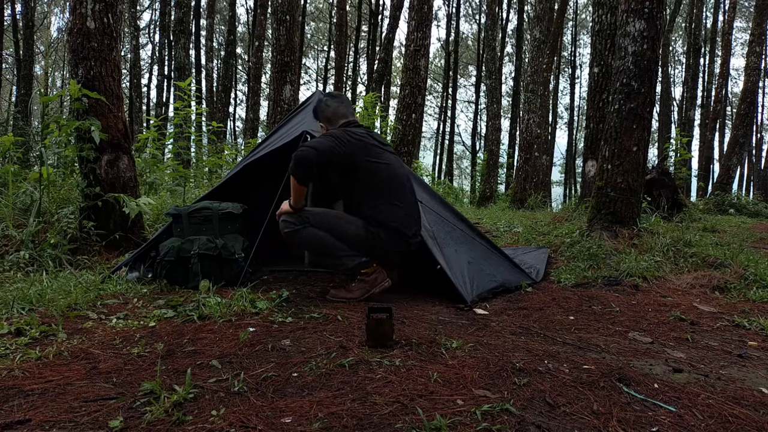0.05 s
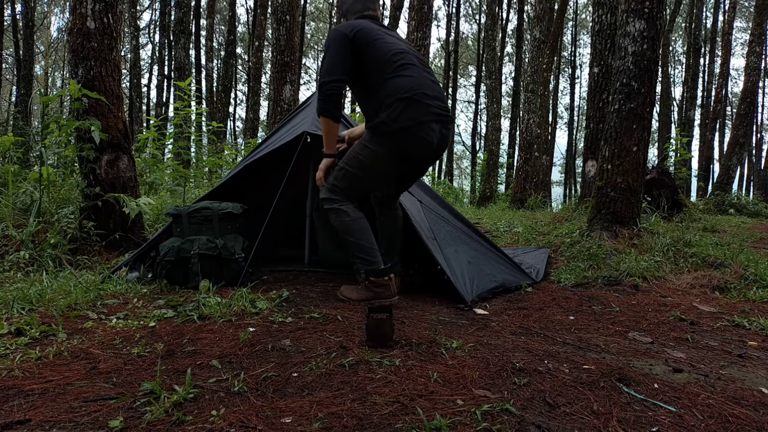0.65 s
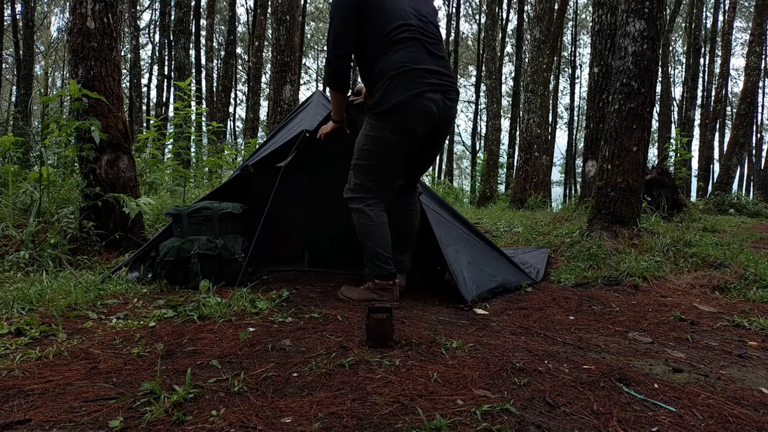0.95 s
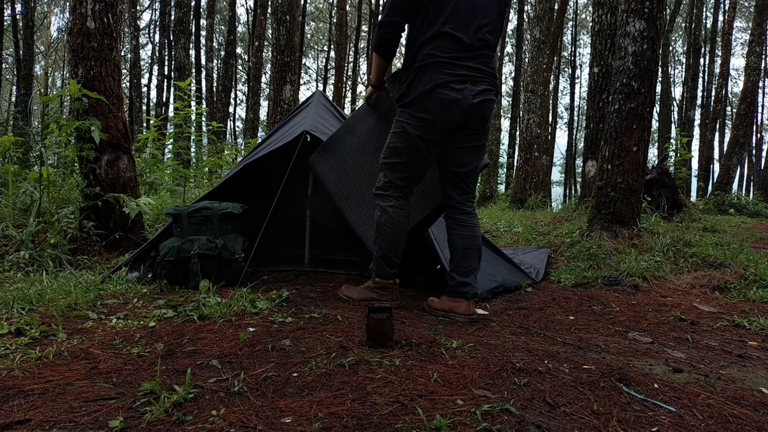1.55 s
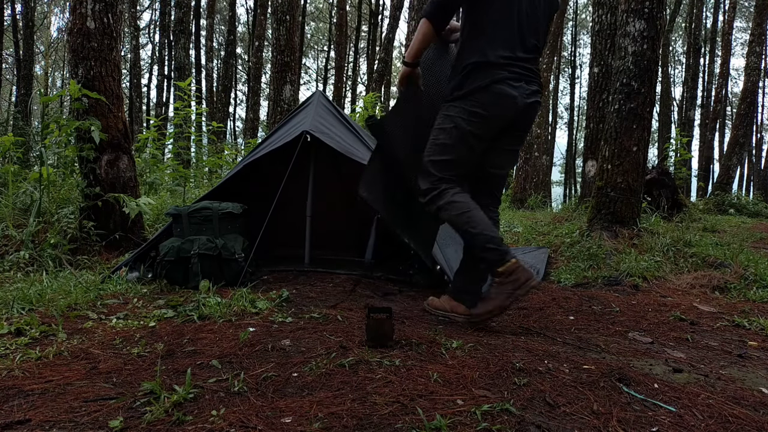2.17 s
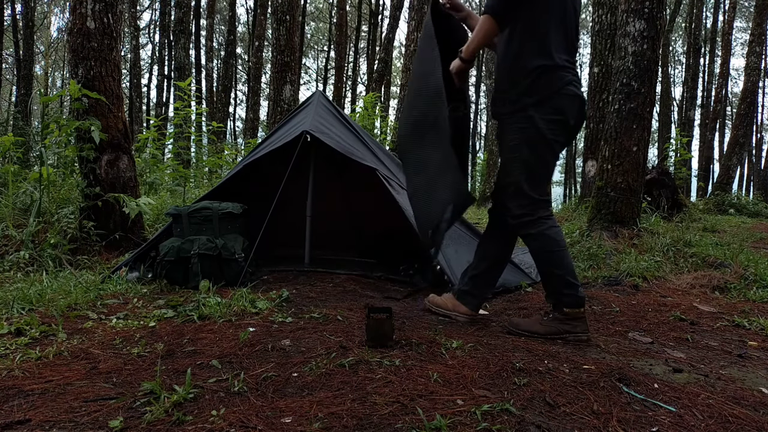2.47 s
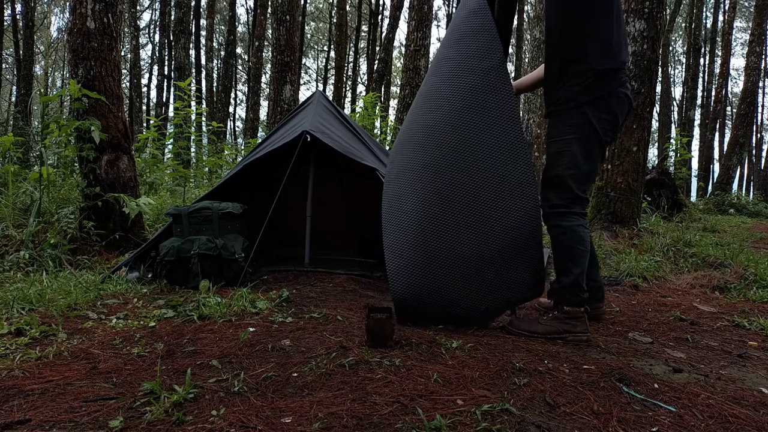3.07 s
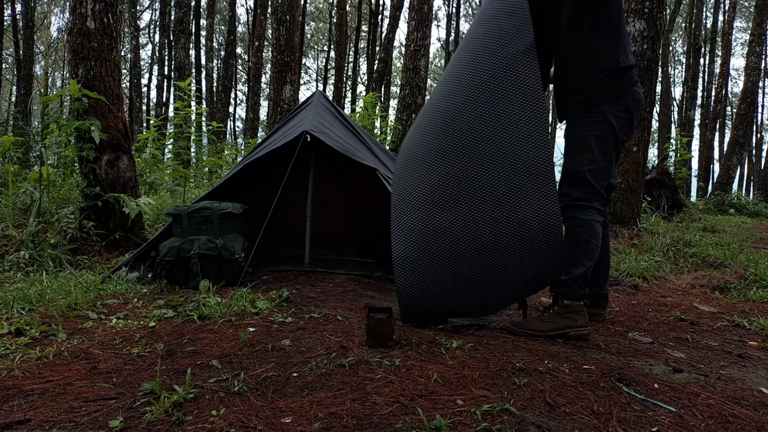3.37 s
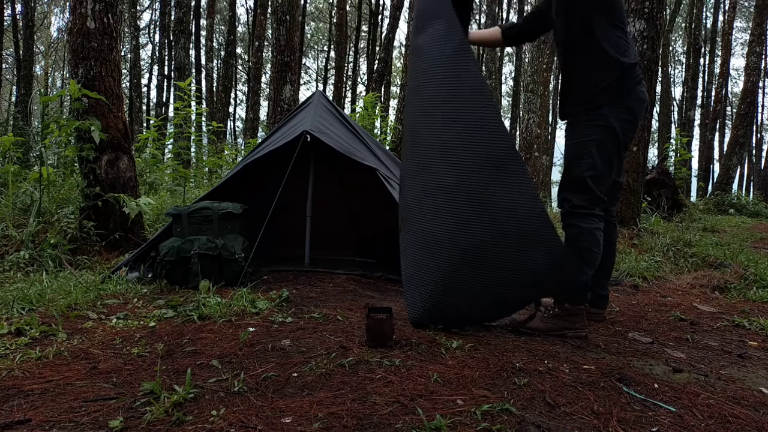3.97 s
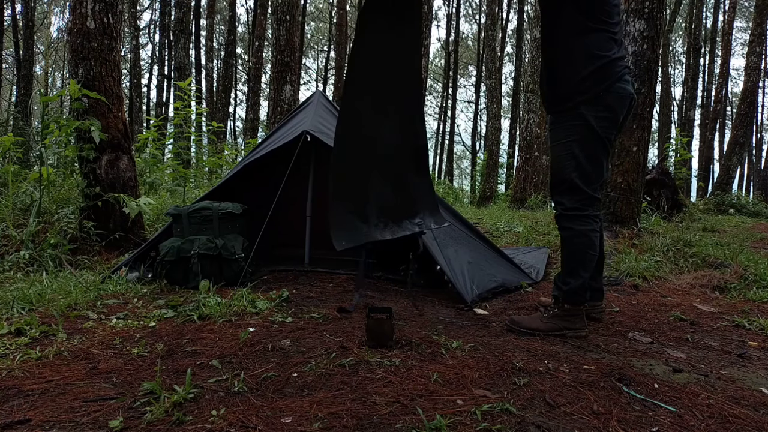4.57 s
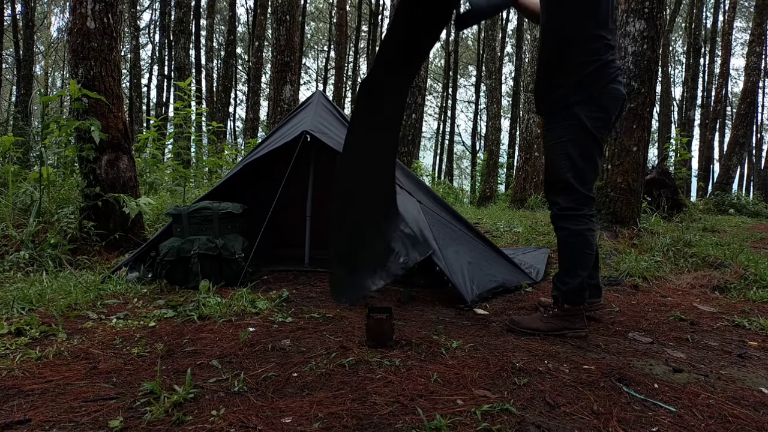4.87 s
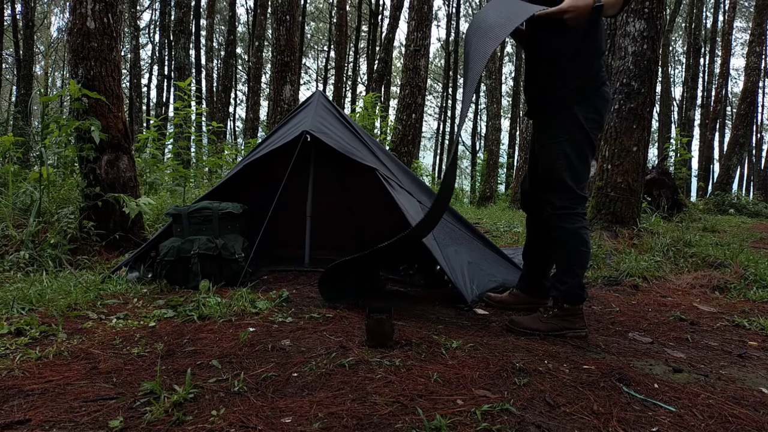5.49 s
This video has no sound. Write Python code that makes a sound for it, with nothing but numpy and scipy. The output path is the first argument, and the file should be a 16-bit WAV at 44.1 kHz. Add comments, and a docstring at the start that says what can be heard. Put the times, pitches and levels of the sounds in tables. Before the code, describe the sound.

In a quiet forest, someone close to the microphone pulls a foam mat from a tent: rustling clothes, a hiss of nylon and several blunt bumps. Trousers brush and a twig ticks. The mat then unrolls in the loudest burst, its ribs catching and squeaking while the loose sheet wobbles and knocks. It settles into light rubbing and one shorter swish against the tent, with a faint low rumble of air underneath.

```python
"""A foam sleeping mat swishes out of a nylon tent and is unrolled in a quiet pine forest.
Its ribbed faces scrape, catch and squeak as the roll falls open; the loose sheet wobbles and knocks.
A second, shorter swish slides it back along the fabric. Clothes rustle, needles and twigs tick.
Underneath lies a bed of still air with one far insect, and the trunks send back a faint tail."""
import sys
import numpy as np
from scipy import signal
from scipy.fft import rfft, irfft, next_fast_len
from scipy.io import wavfile
from scipy.ndimage import uniform_filter1d

SR = 44100
rng = np.random.default_rng(int(sys.argv[2]) if len(sys.argv) > 2 else 0)


def store_wav(level_fs):
    """Save 16-bit WAV to argv[1]."""
    pcm = np.round(np.clip(np.atleast_2d(level_fs), -1, 1) * 32767)
    wavfile.write(sys.argv[1], SR, pcm.T.astype(np.int16))


N = 252693
TIME = np.arange(N) / SR

# Tone curves for the noise layers. Each row: frequency in Hz, relative level in dB.
AIR_EQ = [(15, 1.5), (40, 7.5), (75, 5), (140, 5.5), (220, -2), (330, -9.5), (700, -13), (1300, -16.5),
          (2500, -20.5), (4500, -23.5), (8000, -26.5), (14000, -29.5)]  # still forest
RUMBLE_EQ = [(15, -41), (45, 4), (80, -1.5), (120, -3), (220, -39)]  # air pushed by the handling
SHIRT_EQ = [(120, -22), (200, -3), (459, -7.5), (761, -11), (1040, -19), (1150, -15), (2210, -11.5),
            (3290, -19.5), (3940, -21), (4890, -13), (7550, -2.5), (13700, -18.5), (15000, -25)]  # bright shirt rustle
LEGS_EQ = [(150, -10), (280, -11), (420, -0.5), (750, -19), (1300, -13), (2300, -13), (3100, -15),
           (4400, -14.5), (5500, -17), (8200, -14.5), (10000, -25), (15000, -37)]  # legs rubbing
SHEET_BRUSH_EQ = [(40, -20), (120, 5.5), (250, 3), (600, -8.5), (1100, -9), (1600, -8), (2700, -11.5),
                  (3500, -12), (4800, -16.5), (8000, -16), (10500, -33), (15000, -40)]  # dark brushing of the foam sheet
FLUTTER_EQ = [(40, -20), (110, -30), (180, -2.5), (380, -2), (600, -8.5), (950, -27), (1500, -15),
              (3000, -34), (8000, -49)]  # a bend spreading through the sheet
SHEET_MODES_EQ = [(115, -34), (165, 12), (250, 13), (320, 11), (480, 0), (900, -59)]  # modes around the main wobble
SCRAPE_BODY_EQ = [(30, -34), (110, -21), (200, 8.5), (500, 7.5), (900, 2.5), (1400, -0.5), (2400, -4),
                  (3700, -9.5), (4600, -28), (8000, -35), (14000, -61)]  # coarse slips of the ribs
SCRAPE_HISS_EQ = [(2500, -24), (4300, -2), (6000, 2.5), (8300, 0.5), (10500, -10.5), (14000, -23.5)]  # the foam's fine skin
RASP_EQ = [(100, -7), (250, -7), (480, 6), (750, -2.5), (920, 0), (1200, -11.5), (1620, 1), (2200, 0.5),
           (2750, -4), (3300, -6), (3800, -4), (4800, -15)]  # mat pressing on nylon
SLIDE_OUT_EQ = [(1470, -41), (2500, -11.5), (3040, -5), (3320, -14), (3640, -6.5), (5830, 1), (10500, -2.5),
                (14200, -17.5), (14700, -30), (15000, -55.5)]  # nylon hiss, outward stroke
SLIDE_BACK_EQ = [(1470, -51), (2500, -22), (2630, -28), (3690, -6), (4730, -5.5), (8880, -5.5),
                 (10500, -8.5), (12000, -23), (13900, -26), (14700, -34.5), (15000, -63.5)]  # nylon hiss, return stroke

# The tail among the trunks. Each row: frequency in Hz, t60 in seconds.
FOREST_DECAY = [(150, 0.37), (1000, 0.45), (4000, 0.51), (12000, 0.18)]
# Twigs giving softly. Each row: start in seconds, level in dB, lowest mode in Hz, rise and t60 in
# seconds, tilt in dB per octave.
TWIG_CRACKS = [(1.802, -45, 1117, 0.0018, 0.021, -12), (4.8515, -51.5, 778, 0.0057, 0.048, 0.5)]
# A twig's woody ring. Each row: frequency as a multiple of the lowest mode, relative level in dB.
WOOD_MODES = [(1, -1), (2.03, -2), (2.87, -11), (3.51, -19), (4.06, -17), (4.95, -13), (5.92, -23)]
# Movements of body or sheet. Each row: peak time in seconds, base level in dB, rise and fall in
# seconds, what rubs ("shirt", "legs" or "sheet").
MOVEMENTS = [(.08, -68, 0.11, 0.19, "shirt"), (.35, -62.5, 0.27, 0.18, "shirt"),
             (.55, -62.5, 0.16, 1, "shirt"), (.72, -61.5, 0.1, 0.14, "shirt"),
             (1.25, -70, 0.049, 0.18, "legs"), (1.335, -59, 0.11, 0.18, "legs"),
             (1.47, -69, 0.13, 0.37, "legs"), (1.73, -68.5, 0.58, 0.31, "legs"),
             (1.88, -68.5, 0.03, 0.21, "legs"), (2.01, -64, 0.18, 0.19, "legs"),
             (2.29, -66.5, 0.28, 0.23, "legs"), (2.70, -67.5, 0.12, 0.29, "legs"),
             (3.41, -66, 0.037, 0.19, "sheet"), (3.962, -58.5, 0.18, 0.059, "sheet"),
             (4.219, -67, 0.19, 0.22, "sheet"), (5.33, -74.5, 0.59, 0.22, "sheet")]
# Taut weave zipping past. Each row: peak time in seconds, level in dB, rise and fall in seconds,
# centre and width in Hz.
WEAVE_ZIPS = [(0.514, -66, 0.046, 0.11, 4020, 990), (.89, -59.5, 0.079, 0.079, 2240, 220),
              (.96, -60, 0.034, .035, 1586, 120), (1.13, -60.5, 0.044, 0.063, 1880, 1200),
              (1.755, -76, 0.027, .04, 2680, 400), (1.872, -69, 0.013, 0.025, 8350, 500),
              (2.021, -74, 0.091, 0.068, 7900, 1400), (2.29, -74.5, 0.14, 0.23, 7530, 1000),
              (2.914, -57, .012, 0.016, 2950, 250), (3.165, -64, 0.043, 0.027, 3600, 300),
              (5.065, -62.5, 0.037, 0.067, 2080, 400), (5.265, -80, .05, .05, 3950, 150),
              (5.4, -83, 0.043, 0.056, 2050, 150)]
# Single ribs and dry needles flicking. Each row: start in seconds, level in dB, centre in Hz,
# t60 in seconds.
FLICKS = [(1.085, -42, 870, 0.035), (2.5445, -68, 6140, .015), (2.864, -37.5, 3090, 0.01),
          (2.965, -47, 1680, 0.021), (2.985, -39.5, 2850, 0.014), (3.0737, -37, 2830, 0.017),
          (3.107, -42.5, 2900, 0.017), (3.109, -38.5, 6060, 0.019), (3.139, -44.5, 3600, 0.036),
          (3.3772, -44.5, 4640, 0.0085), (3.3772, -51.5, 6700, .008), (3.383, -50, 6500, .008),
          (3.402, -45, 2240, 0.01), (3.697, -58, 4970, 0.016), (3.914, -50, 3500, .012),
          (3.9755, -52, 2700, 0.015), (3.9755, -52, 6500, .01), (5.171, -48, 890, 0.022)]
# The sheet buckles or is bumped. Each row: start in seconds, level in dB, pitch in Hz, t60 in seconds,
# snap level in dB relative to the swing, time to the snap's peak in seconds.
SHEET_KNOCKS = [(0.475, -53.5, 635, 0.019, -11, .0003), (1.0841, -30.5, 482, .035, -17, 0.0011),
                (1.3194, -25.5, 318, 0.017, -2, 0.00054), (1.3227, -34.5, 403, 0.018, 5, 0.00058),
                (1.3264, -35, 930, 0.024, -6, 0.00045), (1.3487, -36.5, 507, 0.02, 6, 0.00088),
                (1.3548, -38, 394, .05, -8, 0.00056), (1.366, -41, 538, 0.037, -10, .0007),
                (1.384, -47, 380, .06, 1, 0.0009), (1.858, -53.5, 443, 0.14, -11, 0.00042),
                (1.9956, -45.5, 387, 0.035, -4, 0.00079), (2.0328, -37.5, 297, 0.014, -3, 0.00091),
                (2.037, -47, 459.5, 0.15, -22, 0.00055), (2.831, -50, 194, 0.23, -8, 0.00044),
                (2.8633, -39.5, 467, 0.022, 4, 0.00027), (2.987, -49, 378, .12, -12, .0006),
                (3.1425, -30.5, 205, 0.067, 0, 0.00095), (3.229, -29.5, 1100, .005, -2, 0.00024),
                (3.235, -29, 940, .011, -1.5, 0.00028), (3.2454, -29.5, 955, 0.0051, -1, 0.00032),
                (3.2482, -30, 274, 0.048, -3.5, 0.00089), (3.2657, -32.5, 336, .025, 3, 0.00037),
                (3.282, -38, 380, 0.017, 6, 0.00039), (3.3769, -23.5, 350, 0.0086, -0.5, 0.00089),
                (3.3824, -34, 213, 0.032, 4.5, 0.00074), (3.3882, -33, 240, 0.03, -2, 0.00074),
                (3.4022, -32, 620, 0.013, 7, 0.00047), (3.4062, -37, 246, 0.052, 1, .0007),
                (4.282, -45.5, 280, 0.075, 0, 0.00062), (5.166, -50, 292, 0.088, 2, .0004)]
# Foam voicing, from low groans to squeaks. Each row: start and length in seconds, pitch in Hz,
# level in dB, loss per overtone in dB, shake as a share of the pitch.
FOAM_SQUEAKS = [(0.907, 0.031, 282, -40.5, 12.5, 0.13), (0.947, 0.042, 308, -40, 13, 0.18),
                (1.095, .042, 460, -42.5, 25, 0.18), (1.645, 0.031, 402, -60, 24, 0.14),
                (1.671, 0.06, 394, -62, 21, 0.054), (3.017, 0.022, 345, -25, 27, 0.055),
                (3.008, 0.053, 800, -38, 25, 0.12), (3.007, 0.066, 1146, -44.5, 18, .062),
                (3.135, .015, 1138, -43.5, 23, 0.064), (4.042, 0.063, 832, -62.5, 8.5, 0.22),
                (4.296, 0.069, 984, -65.5, 18, 0.087), (4.319, 0.034, 712, -56, 17, 0.091)]
# Foam scraping on foam. Each row: start in seconds, level of the coarse slips in dB, rise and t60 in
# seconds, tilt of the slips in dB per octave, level of the fine hiss in dB.
RIB_SCRAPES = [(.9, -50, 0.0062, 1, -10.5, -66), (1.225, -60.5, 0.024, 0.41, 2, -73),
               (1.298, -50, .014, .06, -7, -75), (1.323, -46, 0.0063, 0.16, -7, -62),
               (1.925, -52.5, 0.12, .3, -9, -82), (2.831, -66, 0.0059, 1, 8, -67.5),
               (2.856, -46.5, 0.016, 0.089, 2, -56.5), (2.898, -56.5, .015, 0.51, 17, -56),
               (2.94, -58.5, .024, 0.34, 0, -58), (2.985, -47.5, 0.0024, 0.14, -0.5, -62),
               (3.0125, -40.5, 0.0018, 0.44, 3, -44.5), (3.073, -46, 0.0036, 0.18, 10, -60),
               (3.103, -41.5, 0.0035, 0.043, 8, -54), (3.138, -42, .003, 0.062, -11, -74),
               (3.229, -43, 0.0006, .03, 7, -58), (3.2312, -36.5, 0.0015, 0.096, 2, -49),
               (3.247, -47, 0.0035, 0.24, -0.5, -53.5), (3.261, -41, 0.0035, .13, -1, -67),
               (3.295, -40.5, 0.021, 0.19, 0, -57), (3.377, -48, 0.0076, .16, -1, -66),
               (4.16, -63, 0.036, .16, 5.5, -84), (5.09, -53.5, 0.035, 0.26, -2, -67),
               (5.41, -72.5, 0.034, .07, 9, -80)]
# The mat slides on the tent, out and back. Each row: times of reaching speed and of starting to slow
# in seconds, base level in dB, attack and release in seconds, times of slipping free and of full
# pressure in seconds, rasp level in dB, air pocket pitch on reaching speed in Hz, its glide in octaves
# per second, its level in dB. Rasp and pocket levels are relative to the hiss.
STROKES = [(.785, 1.025, -52.5, 0.11, 0.16, 1.025, 0.68, -5, 2350, -0.89, -15.5),
           (5.04, 5.12, -53, 0.067, 0.027, 5.108, 5.085, -8.5, 3800, -1.2, -6.5)]


def amp(db):
    """Decibels to gain."""
    return 10 ** (np.asarray(db) / 20)


def unit(x):
    """Scales to rms 1."""
    return x / np.sqrt(np.mean(x ** 2) + 1e-20)


def read(points, hz):
    """Reads a curve on a log-frequency axis."""
    point_hz, value = np.transpose(points)
    return np.interp(np.log(hz + 1), np.log(point_hz + 1), value)


def colour(x, eq, tilt_db=0):
    """Shapes x with a tone curve, plus a tilt per octave above about 500 Hz, at rms 1."""
    hz = np.fft.rfftfreq(len(x), 1 / SR)
    gain = amp(read(eq, hz) + tilt_db * np.log2(1 + hz / 500))
    return unit(irfft(rfft(x) * gain, len(x)))


def add(mix, start, sound):
    """Lays a sound into the mix at a start time in seconds."""
    part = mix[max(round(start * SR), 0):][:len(sound)]
    part += sound[:len(part)]


def drift(n, hz):
    """Smooth random modulation up to a rate of hz, at about rms 1."""
    noise = rng.standard_normal(next_fast_len(n + SR // 2))
    return colour(noise, [(hz, 0), (2 * hz, -80)])[:n]


def swell(peak, rise, fall, shape=2):
    """Envelope, 20 dB down one rise before the peak and one fall after; shape 1 is pointed, 2 round."""
    away = np.maximum((peak - TIME) / rise, (TIME - peak) / fall)
    return amp(-20 * np.minimum(away, 10) ** shape)


def resonate(x, hz, width_hz):
    """A steep resonance at a steady or gliding pitch, at rms 1."""
    carrier = np.exp(2j * np.pi * np.cumsum(hz * np.ones(len(x))) / SR)
    pole = np.exp(-np.pi * width_hz / SR)
    return unit((carrier * signal.lfilter([1], [1, -2 * pole, pole * pole], x / carrier)).real)


def friction(n, slips_per_s, share):
    """Separate slips of uneven size, with a share of the power, over the hiss of countless tiny ones."""
    slips = rng.standard_normal(n) * (rng.random(n) < slips_per_s / SR)
    return np.sqrt(share) * unit(slips) + np.sqrt(1 - share) * rng.standard_normal(n)


def folds(x, depth_db):
    """Moving folds and pockets give rubbing noise narrow resonances that come and go."""
    hz, _, spectrum = signal.stft(x, SR, nperseg=1024)
    patches = rng.standard_normal(spectrum.shape)
    for _ in range(2):
        patches = uniform_filter1d(uniform_filter1d(patches, size=4, axis=0), size=8, axis=1)
    patches = np.minimum(unit(patches), 1.9)
    distinct = 1 / (1 + (hz[:, None] / 9000) ** 4)  # in the top end they crowd together and even out
    spectrum = spectrum * amp(depth_db * distinct * patches)
    return unit(signal.istft(spectrum, nperseg=1024)[1][:len(x)])


def forest_air(air_db=-68, insect_db=-88, insect_hz=3340):
    """The bed: low rumble and thin hiss of still air, and a far insect trill that swells and fades."""
    trill = np.sqrt(2) * drift(N, hz=170) * np.sin(2 * np.pi * insect_hz * TIME)
    insect = amp(insect_db) * swell(peak=5.33, rise=3.6, fall=0.43) * trill
    return amp(air_db) * colour(rng.standard_normal(N), AIR_EQ) + insect


def trunk_echoes(x, wet_db=-23, echoes_per_s=1500, predelay_s=0.012):
    """Sparse reflections from the trunks, each band dying at its own speed."""
    taps = rng.standard_normal(SR) * (rng.random(SR) < echoes_per_s / SR)
    taps *= np.arange(SR) > predelay_s * SR
    hz, t, spectrum = signal.stft(taps, SR, nperseg=256)
    decay = amp(-60 * t / read(FOREST_DECAY, hz)[:, None])
    tail = signal.istft(spectrum * decay, SR, nperseg=256)[1]
    return amp(wet_db) * signal.fftconvolve(x, tail / np.linalg.norm(tail))[:N]


def pushed_air(handling, gain_db=-35, follow=0.69):
    """Soft low-end pressure of pushed air, growing with the vigour of the handling."""
    vigour = np.sqrt(abs(uniform_filter1d(handling ** 2, size=4400)))
    return colour(rng.standard_normal(N), RUMBLE_EQ) * amp(gain_db) * vigour ** follow


def twigs():
    """Wood cracks softly under a load: its modes swell roughly for a few milliseconds and die."""
    out, t = np.zeros(N), np.arange(SR // 8) / SR
    for start, db, hz, rise, t60, tilt_db in TWIG_CRACKS:
        cycles = np.cumsum(hz * (1 + 0.035 * drift(len(t), hz=500))) / SR
        ring = sum(amp(mode_db + tilt_db * np.log2(k)) * np.sin(2 * np.pi * (k * cycles + rng.random()))
                   for k, mode_db in WOOD_MODES)
        splinter = amp(3 * drift(len(t), hz=700))
        envelope = np.minimum(t / rise, 1) ** 2 * amp(db - 60 * np.maximum(t - rise, 0) / t60)
        add(out, start, ring * splinter * envelope)
    return out


def rustle(part, eq, gain_db):
    """Soft, uneven brushing that swells and fades with each movement of one part."""
    grains = folds(colour(friction(N, slips_per_s=1500, share=0.14), eq), depth_db=4.4)
    power = sum((amp(db) * swell(peak, rise, fall, shape=1.37)) ** 2
                for peak, db, rise, fall, what in MOVEMENTS if what == part)
    return grains * np.sqrt(power) * amp(gain_db + 1.24 * drift(N, hz=37.8))


def ground_bounce(x, delay_s=0.000883, gain=0.38, sway=0.049):
    """One close reflection off the ground combs the sound into ridges that shift as the legs move."""
    delay = delay_s * (1 + sway * drift(N, hz=3.4))
    echo = np.interp(np.round((TIME - delay) * SR), np.arange(N), x)
    return (x + gain * echo) / np.hypot(1, gain)


def zips(flicker_db=3):
    """Short, rasping, narrow-band spurts of cloth sliding over cloth."""
    out = np.zeros(N)
    for peak, db, rise, fall, hz, width in WEAVE_ZIPS:
        envelope = swell(peak, rise, fall)
        heard = envelope > 0.01
        slips = friction(heard.sum(), slips_per_s=600, share=0.43)
        out[heard] += amp(db) * envelope[heard] * resonate(slips, hz, width)
    return out * amp(flicker_db * drift(N, hz=60))


def crackles():
    """Each flick of a rib or dry needle rings briefly in a broad resonance."""
    out, t = np.zeros(N), np.arange(SR // 4) / SR
    for start, db, hz, t60 in FLICKS:
        band = [(hz / 4, -40), (hz / 1.5, -20), (hz, 0), (hz * 1.5, -20), (hz * 4, -60)]
        envelope = np.minimum(20 * t / t60, 1) * amp(db - 60 * t / t60)
        add(out, start, envelope * colour(rng.standard_normal(len(t)), band))
    return out


def knocks(flutter_db=-14, flutter_t60=0.11):
    """A blunt snap, a few damped swings of the sheet, then flutter as the bend spreads through it."""
    out, t = np.zeros(N), np.arange(SR // 4) / SR
    # air slips around the edges of an open sheet, so it radiates little bass
    low_cut = signal.butter(2, 130, "high", fs=SR, output="sos")
    flutter_envelope = amp(flutter_db - 60 * t / flutter_t60) * (1 - np.exp(-t / 0.0024))
    for start, db, hz, t60, snap_db, snap_s in SHEET_KNOCKS:
        age = t / snap_s
        snap = amp(snap_db) * (age * np.exp(1 - age)) ** 4
        swing = np.sin(2 * np.pi * hz * t) * amp(-60 * t / t60) * (1 - np.exp(-2 * age ** 2))
        flutter = colour(rng.standard_normal(len(t)), FLUTTER_EQ) * flutter_envelope
        add(out, start, amp(db) * (signal.sosfilt(low_cut, swing + snap) + flutter))
    return out


def wobble(start=3.02, rise=0.026, t60=0.43, gain_db=-30):
    """The roll falls open: its bending modes swing up, the main one sags in pitch, all are checked."""
    taut_hz, slack_hz, slacken_s = 324.5, 208, 0.05
    checked_at, checked_t60 = 3.172, 0.088
    t = np.maximum(TIME - start, 0)
    hz = slack_hz + (taut_hz - slack_hz) * np.exp(-t / slacken_s)
    lurch = 1 + 0.13 * drift(N, hz=130)
    cycles = np.cumsum(lurch * hz) / SR
    swing = unit(np.sin(2 * np.pi * cycles) * amp(2 * drift(N, hz=70)))
    neighbours = 0.5 * colour(rng.standard_normal(N), SHEET_MODES_EQ)
    fade = np.maximum(t - rise, 0) / t60 + np.maximum(TIME - checked_at, 0) / checked_t60
    envelope = np.minimum(t / rise, 1) * amp(gain_db - 60 * np.minimum(fade, 10))
    return envelope * (swing + neighbours)


def squeaks():
    """Foam sticks and slips in step: brief tones, shaky in pitch and strength."""
    out = np.zeros(N)
    for start, length, hz, db, fall_db, shake in FOAM_SQUEAKS:
        n = int(length * SR)
        cycles = np.cumsum(hz * (1 + shake * drift(n, hz=400))) / SR
        tone = sum(amp(-fall_db * k) * np.sin(2 * np.pi * k * cycles) for k in range(1, 6))
        grip = amp(2.8 * drift(n, hz=300))
        add(out, start, amp(db) * unit(tone * grip) * signal.windows.hann(n))
    return out


def scrapes():
    """Ribs catch and let go in a coarse burst, topped by the smooth hiss of the foam's skin."""
    out, t = np.zeros(N), np.arange(SR // 2) / SR
    for start, db, rise, t60, tilt_db, hiss_db in RIB_SCRAPES:
        envelope = np.minimum(t / rise, 1) * amp(-60 * np.maximum(t - rise, 0) / t60)
        coarse = folds(friction(len(t), slips_per_s=900, share=0.4), depth_db=4.2)
        fine = folds(friction(len(t), slips_per_s=4000, share=0.2), depth_db=3)
        body = amp(db) * colour(coarse, SCRAPE_BODY_EQ, tilt_db)
        hiss = amp(hiss_db) * colour(fine, SCRAPE_HISS_EQ)
        add(out, start, envelope * (body + hiss))
    return out


def swish(stroke, eq, gain_db, pull_db_per_s=13.5):
    """Mat on nylon: weave hiss, a lower rasp under pressure, an air pocket that sinks as it opens."""
    start, end, db, attack, release, slip_at, press_at, rasp_db, pocket_hz, glide, pocket_db = stroke
    outside = np.maximum((start - TIME) / attack, 0) + np.maximum((TIME - end) / release, 0)
    envelope = amp(db - 20 * np.minimum(outside, 10) ** 2)
    pressure = amp(-20 * np.clip((press_at - TIME) / attack, 0, 2))
    pull_db = pull_db_per_s * (np.clip(TIME, start, end) - start)  # the pull grows harder
    slip_db = 4 * np.exp(-((TIME - slip_at) / 0.015) ** 2)  # slipping free: hiss surges, pocket ducks
    hiss = folds(colour(friction(N, slips_per_s=6600, share=0.13), eq), depth_db=3) * amp(slip_db)
    rasp = folds(colour(friction(N, slips_per_s=500, share=0.5), RASP_EQ), depth_db=5.5)
    rasp *= amp(rasp_db) * pressure
    sinking_hz = pocket_hz * 2 ** (glide * np.clip(TIME - start, -0.5, 0.5))
    pocket = resonate(rng.standard_normal(N), sinking_hz, width_hz=0.29 * pocket_hz)
    pocket *= amp(pocket_db - 2 * slip_db)
    grip = amp(1.6 * drift(N, hz=55))
    return amp(gain_db + pull_db) * envelope * (hiss * grip ** 0.38 + (rasp + pocket) * grip)


def scene():
    """The mono mix: close handling up front, its tail and low end, and the forest bed."""
    sliding = swish(STROKES[0], SLIDE_OUT_EQ, gain_db=1.5) + swish(STROKES[1], SLIDE_BACK_EQ, gain_db=0.5)
    brushing = rustle("shirt", SHIRT_EQ, gain_db=-0.5)
    brushing += ground_bounce(rustle("legs", LEGS_EQ, gain_db=2))
    brushing += rustle("sheet", SHEET_BRUSH_EQ, gain_db=3)
    near = sliding + brushing + twigs() + zips() + scrapes() + crackles()
    near += knocks() + wobble() + squeaks()
    return (near + trunk_echoes(near) + pushed_air(near) + forest_air())[None]


def record(dry):
    """A steep high cut at 14.4 kHz takes off the very top."""
    high_cut = signal.firwin(511, 14400, window=("kaiser", 9), fs=SR)
    return signal.oaconvolve(dry, high_cut[None], "same")


dry = scene()
out = record(dry)
store_wav(out)
```